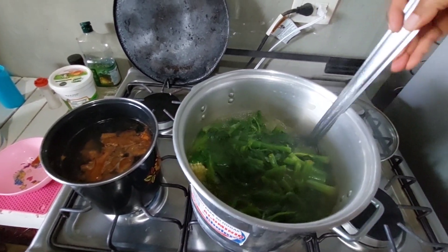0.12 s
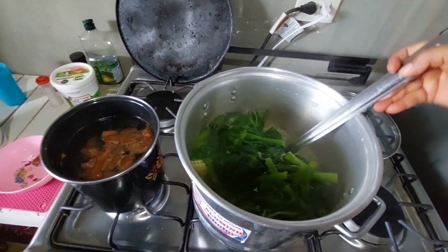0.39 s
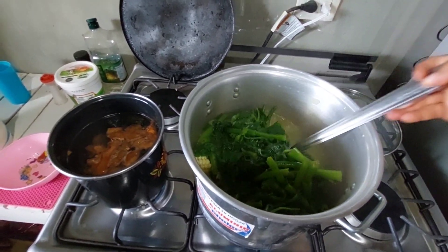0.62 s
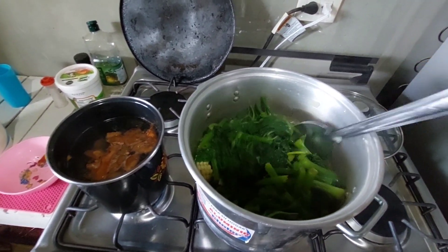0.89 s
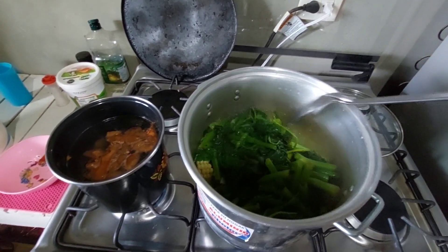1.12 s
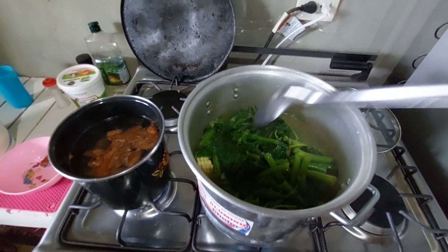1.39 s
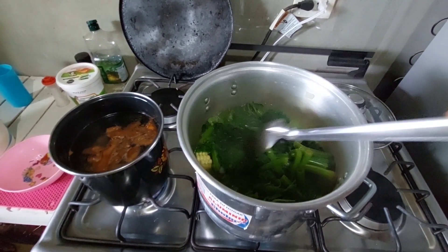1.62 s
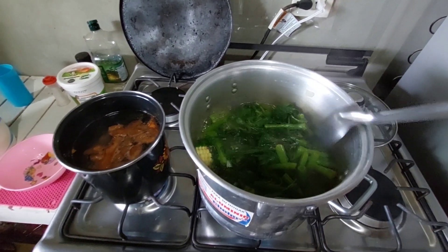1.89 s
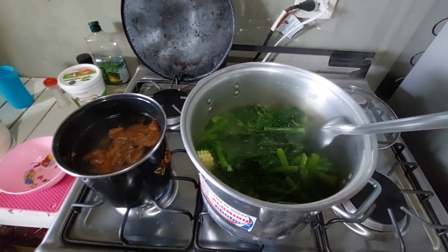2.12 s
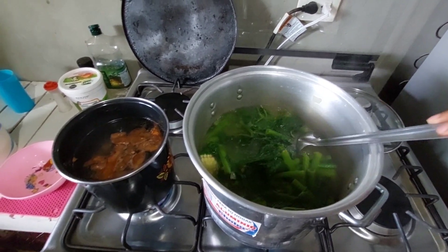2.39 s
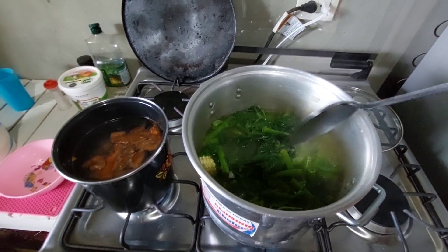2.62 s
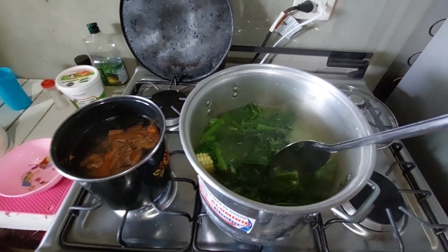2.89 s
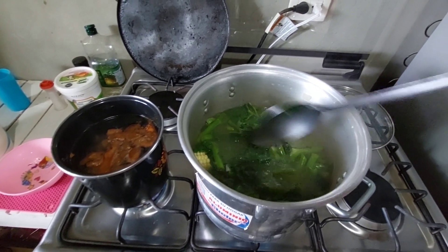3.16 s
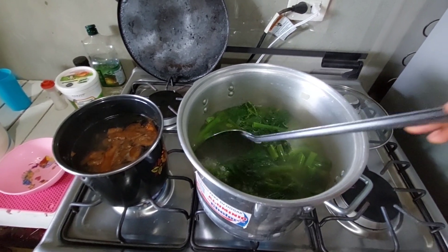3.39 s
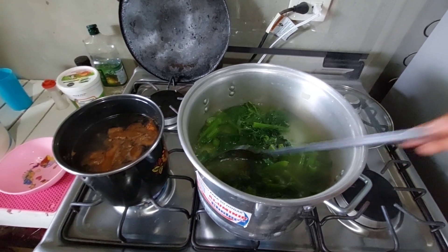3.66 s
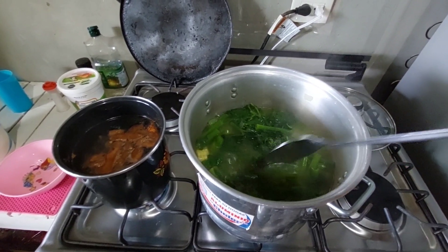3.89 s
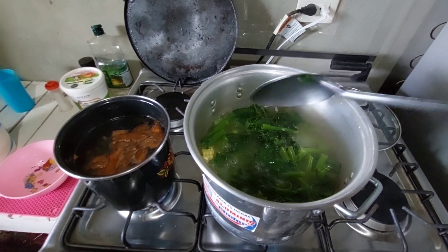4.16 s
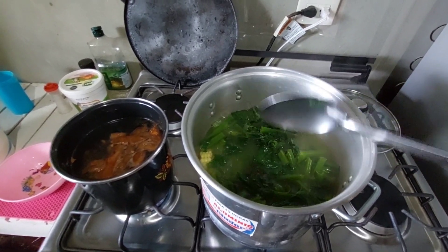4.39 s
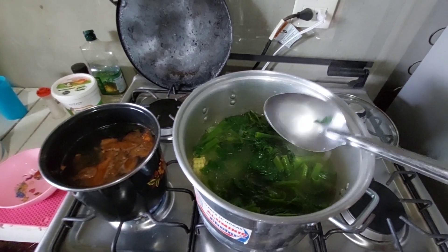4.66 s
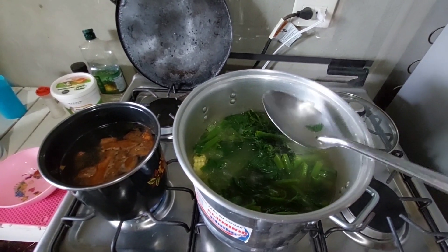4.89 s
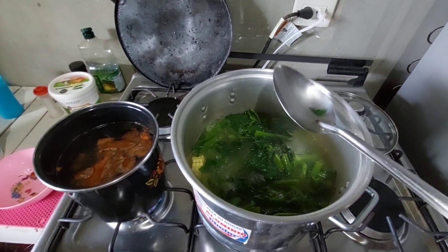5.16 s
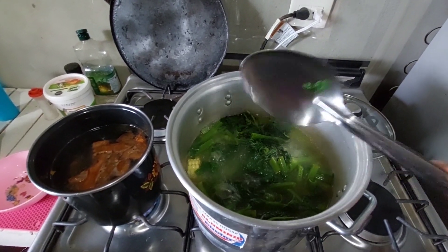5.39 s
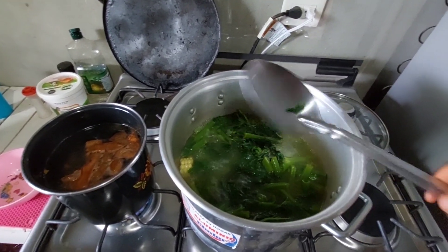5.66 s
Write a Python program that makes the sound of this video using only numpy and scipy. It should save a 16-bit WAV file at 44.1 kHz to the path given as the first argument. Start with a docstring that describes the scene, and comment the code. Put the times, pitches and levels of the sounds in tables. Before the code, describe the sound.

A steel ladle stirs a big pot of soupy greens, with light knocks and scrapes, then sharp bright clanks on the metal rim.

```python
"""First a surge of soup and low pot rumble, then a steel ladle knocks: greens are stirred in a large aluminium
pot on a gas stove, in a small hard-walled kitchen, heard close by at two microphone ports.
Knocks are shaped noise bursts and decaying modes; drags, slosh, burner rumble and air are filtered noise.
Bubbles are short rising sines, squeaks rough tones, and an appliance hums on steady lines.
At the end the ladle is rapped on the rim."""
import sys
import numpy as np
from scipy import signal
from scipy.fft import rfft, irfft, next_fast_len
from scipy.io import wavfile
from scipy.ndimage import map_coordinates

SR = 44100
rng = np.random.default_rng(int(sys.argv[2]) if len(sys.argv) > 2 else 0)


def wrap_up_sound(samples):
    """Save the sound to the file named by the first command line argument, as 16-bit audio."""
    columns = np.atleast_2d(samples).T
    # keep every value between -1 and 1, then stretch to whole-number steps
    tamed = np.clip(columns, -1, 1)
    steps = np.round(tamed * 32767).astype(np.int16)
    wavfile.write(sys.argv[1], SR, steps)


def ratio(d):
    """dB to gain"""
    e = np.asarray(d, float) / 20
    return 10 ** e


N = 254898

# Ladle on pot: start_s, strength_db, wall_db and thud_db (both relative to strength_db),
# then one or more pitch_hz, whose nearest metal modes the place of contact favours
CONTACTS = [(0.1363, -21, -24, -34, 1780, 5222), (0.2731, -44.5, 0.5, -23, 1100),
            (0.3521, -33, -16.5, -12.5, 1100), (0.6988, -46.5, -14, -5, 5222),
            (0.7799, -41, -42, -28, 5222), (0.8204, -41, -22, -9, 3750), (1.0239, -21, -19.5, -10.5, 6401),
            (1.086, -28.5, -26, -9, 4900), (1.9685, -15, -16.5, -21.5, 1780, 1630),
            (2.151, -23.5, -18, -15.5, 1630), (2.2622, -32, -33, -17, 5222), (2.326, -17, -23, -33, 1100),
            (2.528, -28.5, -28.5, -18, 6830), (2.555, -35, -45, -18, 6830), (2.5776, -33.5, -46, -13, 5222),
            (3.4254, -21.5, -23, -12.5, 7504), (3.6494, -45, -21, -11, 2250),
            (3.9941, -39, -13.5, -15, 3160), (4.4975, -6.5, -26.5, -18, 6051, 2713, 7058),
            (4.6514, -4.5, -24, -20.5, 4800, 7058, 5706, 1780), (4.793, -12.5, -38, -21, 6830, 8080),
            (4.8188, -20.5, -37, -24, 6830), (4.9664, -18, -35, -22.5, 4900, 6051),
            (4.9889, -24, -22.5, -17.5, 4900), (5.164, -31, -22, -27, 4900), (5.1843, -33, -22, -36, 4900),
            (5.3389, -21.5, -40, -26, 6051), (5.3469, -24.5, -24, -38, 5502),
            (5.5687, -6, -25, -14.5, 6830, 4900, 3750, 5706)]
# Ring of ladle and wall: pitch_hz, relative level_db, t60_s
METAL_MODES = [(754, -9, .2), (872, -12, .1), (1100, -6, .28), (1630, -10, .08), (1780, -6, .15),
               (2250, -10, .12), (2713, -6, .13), (3160, -12, .12), (2940, -11, .2), (3710, -8, .35),
               (4200, -12, .08), (4800, -8, .1), (4900, -7, .35), (5222, -10, .07), (5502, -9, .06),
               (5706, -11, .14), (6051, -8, .08), (6401, -12, .2), (6830, -6, .13), (7058, -6, .18),
               (7504, -12, .1), (8080, -10, .17)]
# The full pot rocking on its grate: pitch_hz, level_db (relative to the thud), t60_s
POT_MODES = [(69, -34, 0.8), (150.3, -5, 0.5), (221, 1, 0.33), (266.4, -3, 0.094), (301, -9, 0.4),
             (338, -9, 0.35), (413, -10, 0.32), (447, -11, 0.4), (551, -13.5, 0.48), (630, -14, 0.45),
             (694, -16, 0.2)]
# Colour of the first chatter: frequency_hz, relative level_db
CHATTER_COLOUR = [(500, -54), (1000, -32), (1900, -1), (3000, -6.5), (5000, 3.5), (7000, -4.5), (9000, -9),
                  (11000, -6), (13000, -6.5), (15500, -7), (16800, -55)]
# Dense ring of wall and room: frequency_hz, relative level_db
CLANG_COLOUR = [(880, -4.5), (1500, -5), (2210, -4), (2560, -1), (3840, 1.5), (4420, -0.5), (4830, 0.5),
                (5220, -1), (6830, 2), (9100, -8.5), (12000, -9), (15800, -11), (16000, -46)]
# The wall's duller share: frequency_hz, relative level_db
WALL_COLOUR = [(210, -22), (350, -1), (700, -5.5), (771, -3.5), (1060, -5.5), (1270, -8), (1400, -11),
               (1750, -7.5), (2400, -12.5), (3120, -25), (5280, -120)]
# The ladle drags along the wall: start_s, length_s, grit_db, singing_db
DRAG_STROKES = [(0.0, 0.03, -55, -70), (0.266, 0.1, -53.5, -47.5), (0.331, 0.088, -50.5, -52.5),
                (0.506, 0.11, -58.5, -57.5), (0.69, 0.081, -53.5, -60), (1.035, .09, -50, -69),
                (1.885, 0.06, -64.5, -62), (2.174, 0.14, -47.5, -74), (2.342, 0.056, -60, -48.5),
                (2.542, 0.017, -50, -70), (3.45, 0.21, -58.5, -63), (3.882, 0.1, -65.5, -60),
                (4.637, 0.023, -45, -58), (4.74, 0.4, -57, -69), (5.137, 0.15, -59.5, -61),
                (5.652, .12, -47, -65)]
# Colour of the grit: frequency_hz, relative level_db
GRIT_COLOUR = [(880, -34), (1500, 0), (1790, -4), (3220, -1), (4160, 0.5), (4370, 1), (5220, -2),
               (7170, -1), (8920, -14.5), (12000, -8), (16000, -12)]
# The ladle's edge catches and one mode squeaks: start_s, length_s, level_db, pitch_hz
EDGE_SQUEAKS = [(.285, .02, -60, 2650), (.34, .02, -52, 1150), (.693, .035, -62, 3750),
                (.703, .042, -60, 6200), (.762, .02, -60, 4700), (.765, .025, -61, 7000),
                (.774, .012, -55, 5200), (.776, .03, -61, 2720), (.822, .02, -59, 5200),
                (.822, .045, -63, 2720), (2.152, .045, -55, 2150), (2.195, .035, -56, 2600),
                (2.258, .045, -54, 5200), (2.258, .035, -55, 7200), (2.35, .1, -60, 5700),
                (2.54, .04, -57, 4900), (2.548, .035, -55, 6830), (2.553, .035, -56, 3750),
                (5.07, .07, -59, 4900)]
# Soup and pot over time: time_s, slosh_db, pot_rumble_db
SOUP_LEVELS = [(0.0, -40.5, -37), (0.08, -50, -41), (0.24, -53, -43.5), (0.53, -52, -44),
               (0.79, -55.5, -47.5), (1.09, -57.5, -47.5), (1.54, -62.5, -51.5), (1.98, -58.5, -43),
               (2.14, -60, -44), (2.95, -61.5, -48.5), (3.32, -64, -50), (3.56, -59.5, -45),
               (4.22, -57, -46.5), (4.54, -59.5, -53), (4.67, -42.5, -34), (5.01, -50, -43),
               (5.47, -56.5, -42), (5.6, -57, -46), (5.78, -40.5, -37.5)]
# Colour of the slosh: frequency_hz, relative level_db
SLOSH_COLOUR = [(260, -12), (450, -1), (549, -3.5), (1190, -15.5), (1340, -14.5), (3000, -20.5),
                (3900, -43), (6600, -120)]
# Bubbles and drips that stand out: start_s, strength_db, starting pitch_hz, life_cycles
STANDOUT_PLOPS = [(.257, -31, 880, 1.3), (.409, -27, 1250, 1.2), (.421, -22.5, 880, 1.75),
                  (.4225, -25.5, 1700, 0.9), (.9467, -38, 1070, 2.1), (.997, -44, 12500, 4),
                  (1.71, -40.5, 640, 1.8), (1.925, -35.5, 800, 2), (2.755, -47, 905, 1.5),
                  (2.7696, -40.5, 1240, 2), (2.7744, -45, 2010, 1.8), (3.3633, -48, 1910, 2.7),
                  (3.595, -33, 990, 1.5), (3.669, -45, 1180, 3), (3.7599, -43, 7900, 3.5),
                  (3.77, -47, 11500, 3), (3.864, -43, 740, 2.1), (3.891, -30, 580, 1.4),
                  (3.897, -40, 1060, 2.4), (3.956, -42, 870, 2.6), (3.9935, -30, 1410, 2.5),
                  (4.155, -45, 13500, 3), (4.1845, -44, 11000, 3), (4.2163, -42, 5680, 2.6),
                  (4.283, -41, 1200, 2), (4.2904, -46, 4960, 3.2), (4.4174, -41.5, 5130, 2.9),
                  (5.069, -31.5, 822, 3.4), (5.442, -31.5, 1310, 3.9), (5.4445, -35, 1900, 5.1),
                  (5.448, -33, 800, 1.6), (5.4544, -33, 1490, 1.9), (5.456, -37, 2450, 3),
                  (5.5009, -40, 5400, 2.6), (5.532, -42, 5300, 2.6)]
# The burner heard through the pot: pitch_hz, width_hz, relative level_db
POT_RESONANCES = [(116.4, 8.8, 7), (159, 35, -12), (258, 55.4, -0.5), (363, 42, -17.5), (413, 40, -15.5)]
# The stove's deepest rumble: time_s, level_db
STOVE_LEVELS = [(0.0, -54), (0.35, -55), (1.72, -68), (2.4, -58), (2.72, -79), (4.41, -63), (4.77, -44),
                (5.02, -48), (5.3, -57), (5.78, -53)]
# Lines of the appliance: pitch_hz, level_db
HUM_LINES = [(59.2, -61.5), (118.4, -58.5), (263.8, -57), (414.5, -66), (489.9, -64), (532.9, -72)]
# Colour of the air: frequency_hz, relative level_db
AIR_COLOUR = [(15, -37), (25, -10), (111, -3), (197, -10), (266, 19), (349, 0), (496, -0.5), (766, -37.5),
              (1220, -21.5), (1430, -49), (3410, -41), (7710, -35), (9330, -51), (12500, -41.5),
              (16000, -40)]
# Likeness of the two ports in diffuse sound: frequency_hz, likeness (1 = same, 0 = unrelated)
PORT_LIKENESS = [(60, 1), (290, 0.86), (640, 0.37), (1400, -0.13), (15000, 0.075)]
# Colour difference of the microphones: frequency_hz, left_over_right_db
PORT_BALANCE = [(60, -2), (300, -1.5), (1000, -0.5), (4000, 1.1), (12000, 2)]
# Decay of wall and room: frequency_hz, t60_s
KITCHEN_DECAY = [(200, 0.8), (600, 0.64), (1500, 0.52), (4000, 0.48), (10000, 0.31)]


def knocks():
    """Each contact: a few ms of chatter, a dense clang, a duller wall knock and the pot's thud."""
    out, t = np.zeros((2, N)), np.arange(SR // 2) / SR
    for start_s, db, wall_db, thud_db, pitch_hz, *_ in CONTACTS:
        favoured = np.transpose(METAL_MODES)[0] == nearest_mode(pitch_hz)[0]
        lift_db = 4 + 3 * rng.standard_normal(len(METAL_MODES)) + 2 * favoured
        click = ratio(db + 1.5) * chatter(t, lift_db + 7 * favoured)
        clang = wash(t, lambda hz: ratio(along(CLANG_COLOUR, hz)) * modal(hz, lift_db, width_hz=20))
        wall = wash(t, lambda hz: ratio(along(WALL_COLOUR, hz)) * modal(hz, lift_db, width_hz=12))
        pot = pot_thud(t, db + thud_db)
        near = ports(click, lag_s=0.00012)
        add(out, start_s, near + ratio(db - 20.5) * clang + ratio(db + wall_db) * wall + pot)
        add(out, start_s, ratio(-7) * kitchen(pot))
    return out


def chatter(t, lift_db):
    """The first touch: a few ms of noise gathered around the metal's modes, scaled to peak 1."""
    noise = rng.standard_normal(len(t))
    burst = filtered(noise, lambda hz: ratio(along(CHATTER_COLOUR, hz)) * modal(hz, lift_db, width_hz=170))
    burst *= (1 - np.exp(-t / 0.0004)) * np.exp(-(t / 0.0032) ** 2)
    return burst / np.abs(burst).max()


def wash(t, colour):
    """Countless close modes of wall and room blur into dying noise, louder in its first instants."""
    tail = diffuse(dying(len(t)), colour) * rough(len(t), depth=0.2, top_hz=153)
    onset = (1 - np.exp(-t / 0.00091)) * (1 + 2.14 * ratio(-60 * t / 0.024))
    return onset * tail / np.std(tail[:, t < 0.03])


def pot_thud(t, db):
    """The pot rocks on its grate: decaying low modes, roughened as the grate rattles."""
    thud = ring(POT_MODES, t, spread_db=1)
    # a low room mode near 114 Hz swells in after the pot's modes
    swell = 1 - np.exp(-(t / 0.035) ** 2)
    thud += swell * ring([(114, -2, 0.55)], t, spread_db=1)  # pitch_hz, level_db, t60_s
    rattle = rough(len(t), depth=0.7, top_hz=70) - 1
    rattle_rise = 1 - np.exp(-t / 0.03)
    thud *= ratio(db) * (1 - np.exp(-t / 0.004)) * (1 + rattle_rise * rattle)
    return filtered(thud, lambda hz: 1 / (1 + (55 / (hz + 1)) ** 6))


def pings():
    """The metal's modes ring out of the clang, favoured ones most: a strong instant, then a rough fading tone."""
    out, t = np.zeros((2, N)), np.arange(SR // 2) / SR
    for start_s, db, wall_db, _, first_hz, *also_hz in CONTACTS:
        favoured = []
        for k, pitch_hz in enumerate([first_hz, *also_hz]):
            hz, _, t60 = nearest_mode(pitch_hz)
            # each further mode is 1 dB weaker; long ringers start lower
            favoured.append((hz, -k - 6 * np.log10(max(1, t60 / 0.13)), t60))
        others = [(hz, level_db - 13.5, t60) for hz, level_db, t60 in METAL_MODES]
        tone = ring(favoured, t, spread_db=1) + ring(others, t, spread_db=4)
        ring_db = -18 - 2 * np.log2(first_hz / 2000)
        if first_hz < 2500:  # modes this low belong to the pot wall
            ring_db = max(ring_db, wall_db + 4)
        tone *= ratio(db + ring_db)
        tone *= rough(len(t), depth=0.6, top_hz=45) * (0.6 + 0.5 * ratio(-60 * t / 0.04))
        add(out, start_s, ports(tone, lag_s=0.00004))
        add(out, start_s, ratio(-12) * kitchen(tone))
    return out


def strokes():
    """Grit and singing levels in dB: each drag rises fast, holds and fades."""
    start, length, grit_db, sing_db = np.transpose(DRAG_STROKES)[..., None]
    t = np.arange(N) / SR
    rise_db, fall_db = 402 * (t - start), 135 * (start + length - t)  # slopes in dB per second
    shape_db = np.minimum(0, np.minimum(rise_db, fall_db))
    # between strokes the ladle only brushes the greens
    grit = np.maximum(-72, (grit_db + shape_db).max(axis=0))
    singing = np.maximum(-78, (sing_db + shape_db).max(axis=0))
    return grit, singing


def dragging():
    """The ladle drags on the wall: gritty noise around the metal's modes, and a singing band near 1150 Hz."""
    grit_db, sing_db = strokes()
    lift_db = np.full(len(METAL_MODES), 4.5)
    grit = rush(lambda hz: ratio(along(GRIT_COLOUR, hz)) * modal(hz, lift_db, width_hz=21), flutter_db=0.5)
    singing = rush(lambda hz: 1 / (1 + ((hz - 1150) / 95) ** 2), flutter_db=1.5)
    return ratio(grit_db + 2.2 * wobble(45)) * grit + ratio(sing_db + 1.5 * wobble(60)) * singing


def squeaks():
    """Short rough tones on single modes: the listed ones, and chance ones as loud as the drag allows."""
    out, grit_db, count = np.zeros(N), strokes()[0], 160
    luck, size = rng.random((count, 3)), rng.standard_normal(count)
    chance = []
    for (place, stretch, pick), spread in zip(luck, size):
        grit = grit_db[int(place * N)]
        allowed_db = min(grit, 3 * grit + 2 * 62)  # a drag lighter than -62 dB hardly catches
        pitch_hz = METAL_MODES[int(pick * len(METAL_MODES))][0]
        chance.append((place * N / SR, 0.025 * (0.4 + stretch), allowed_db - 14 + 2 * spread, pitch_hz))
    for start_s, length_s, db, hz in EDGE_SQUEAKS + chance:
        t = np.arange(round(length_s * SR)) / SR
        tone = np.sqrt(np.sin(np.pi * t / length_s)) * np.sin(2 * np.pi * hz * t)
        add(out, start_s, ratio(db) * tone * rough(len(t), depth=1.2, top_hz=170))
    return ports(out, lag_s=0.00004) + ratio(-6) * kitchen(out)[:, :N]


def sloshing():
    """Stirred soup washes about: broad noise, strongest in the low mids, with an uneven level."""
    slosh_db, _ = curves(SOUP_LEVELS)
    slosh = rush(lambda hz: ratio(along(SLOSH_COLOUR, hz)), flutter_db=1)
    return ratio(slosh_db + 2.4 * wobble(25)) * slosh


def bubbles(events, rise, room_db):
    """Short sines of a few cycles whose pitch climbs as the bubble nears the surface."""
    out = np.zeros(N)
    for start_s, db, hz, cycles in events:
        cycles = max(cycles, 0.5)
        turns = np.arange(round(4 * cycles * SR / hz)) * hz / SR
        shape = (1 - np.exp(-turns / 0.5)) * np.exp(-turns / cycles)
        add(out, start_s, ratio(db) * shape * np.sin(2 * np.pi * turns * (1 + rise * turns / cycles)))
    return ports(out, lag_s=0.00003) + ratio(room_db) * kitchen(out)[:, :N]


def fizz():
    """Rows for tiny bubbles that burst at chance moments, sizes and pitches."""
    count, life_cycles = 60, 3
    when = rng.random(count) * N / SR
    size, pitch = rng.standard_normal((2, count))
    pitch_hz = np.minimum(9500 * 2 ** (0.5 * pitch), SR / 3)  # spread of half an octave
    return [(s, -52 + 3 * a, hz, life_cycles) for s, a, hz in zip(when, size, pitch_hz)]


def pot_rumble():
    """The burner rumbles through the pot: noise gathered in the pot's broad low resonances."""
    _, pot_db = curves(SOUP_LEVELS)

    def hollow(f):
        """Sum of the resonance peaks at each frequency."""
        return sum(ratio(db) / (1 + (2 * (f - hz) / width) ** 2) for hz, width, db in POT_RESONANCES)

    return ratio(pot_db + 1.6 * wobble(8.7)) * rush(hollow, flutter_db=2)


def stove_rumble():
    """The stove's deepest rumble: a narrow band of noise around 63 Hz."""
    (stove_db,) = curves(STOVE_LEVELS)
    return ratio(stove_db) * rush(lambda hz: 1 / (1 + ((hz - 63) / 9) ** 4), flutter_db=0.1)


def appliance():
    """Mains-driven hum, each line wavering a little in level and phase."""
    t, hum = np.arange(N) / SR, np.zeros(N)
    for hz, db in HUM_LINES:
        level = ratio(db + 1.1 * wobble(4.92))
        hum += level * np.sin(2 * np.pi * hz * t + 0.3 * wobble(3.77))
    return hum


def room_air():
    """Steady diffuse noise above 600 Hz, and a more fluttering share below."""
    high = rush(lambda hz: ratio(along(AIR_COLOUR, hz)) * (hz > 600), flutter_db=1.6)
    low = rush(lambda hz: ratio(along(AIR_COLOUR, hz)) * (hz <= 600), flutter_db=6.5)
    return ratio(-64.5) * high + ratio(-60) * low


def nearest_mode(pitch_hz):
    """The metal mode closest to a pitch."""
    return min(METAL_MODES, key=lambda mode: abs(mode[0] - pitch_hz))


def modal(hz, lift_db, width_hz):
    """Noise in the metal gathers around its modes, each at its own strength."""
    peaks = 0
    for (mode_hz, db, _), lift in zip(METAL_MODES, lift_db):
        peaks = peaks + ratio(db + lift) / (1 + ((hz - mode_hz) / width_hz) ** 2)
    return 1 + peaks


def ring(modes, t, spread_db):
    """Decaying modes, each struck at a new strength and phase."""
    hz, db, t60 = np.transpose(modes)[..., None]
    strength, phase = rng.standard_normal((2, len(modes), 1))
    level = ratio(db + spread_db * strength - 60 * t / t60)
    return np.sum(level * np.sin(2 * np.pi * hz * t + phase), axis=0)


def rough(n, depth, top_hz):
    """A gain that flutters around 1, as when a ringing part rattles."""
    return 1 + depth * unit(filtered(rng.standard_normal(n), lambda hz: hz < top_hz))


def dying(n):
    """Two unrelated noises in which each frequency dies at its own speed."""
    hz, t, z = signal.stft(rng.standard_normal((2, n)), SR, nperseg=256)
    decay = ratio(-60 * t / along(KITCHEN_DECAY, hz)[:, None])
    return signal.istft(z * decay, SR, nperseg=256)[1][:, :n]


def kitchen(x):
    """A fresh room tail for one sound, arriving 130 samples (3 ms) late."""
    tail = diffuse(dying(SR // 2), lambda hz: 1 + 0 * hz)
    return signal.fftconvolve(np.pad(x, (130, 0))[None], tail / np.linalg.norm(tail[0]), axes=1)


def ports(x, lag_s):
    """A near sound reaches the right port a little later than the left."""
    return filtered(x, lambda hz: np.exp(2j * np.pi * hz * lag_s * np.array([[0.5], [-0.5]])))


def diffuse(pair, gain):
    """Two unrelated signals become a port pair: alike in the bass, nearly unrelated in the treble."""
    def share(hz):
        """Gains of the common and the opposed part."""
        turn = np.arccos(np.clip(along(PORT_LIKENESS, hz), -1, 1)) / 2
        return gain(hz) * [np.cos(turn), np.sin(turn)]

    mid, side = filtered(pair, share)
    return np.array([mid + side, mid - side])


def rush(gain, flutter_db):
    """Diffuse noise of rms 1 whose level flutters every few milliseconds."""
    noise = rng.standard_normal((2, N)) * ratio(flutter_db * wobble(300))
    return unit(diffuse(noise, lambda hz: gain(hz) * (hz < 15950)))


def wobble(rate):
    """A smooth random curve, rate knots a second."""
    knots = rng.standard_normal(int(N * rate / SR) + 4)
    return map_coordinates(knots, [np.arange(N) * rate / SR])


def curves(rows):
    """One value per sample for each column after the time."""
    time_s, *columns = np.transpose(rows)
    return [np.interp(np.arange(N) / SR, time_s, column) for column in columns]


def along(points, hz):
    """(frequency_hz, value) points read on a log axis."""
    f, v = np.transpose(points)
    return np.interp(np.log(hz + 1), np.log(f + 1), v)


def filtered(x, response):
    """x times a response of frequency."""
    n = x.shape[-1]
    m = next_fast_len(n + 8192)
    return irfft(rfft(x, m) * response(np.fft.rfftfreq(m, 1 / SR)), m)[..., :n]


def unit(x):
    """Scaled to rms 1."""
    return x / np.sqrt(np.mean(x ** 2) + 1e-20)


def add(track, start_s, sound):
    """Mix a sound into the track from start_s."""
    part = track[..., round(start_s * SR):][..., :sound.shape[-1]]
    part += sound[..., :part.shape[-1]]


def scene():
    """Everything at the two ports, from the ladle to the room's air."""
    ladle = knocks() + pings() + dragging() + squeaks()
    soup = sloshing() + bubbles(STANDOUT_PLOPS + fizz(), rise=0.017, room_db=-8)
    background = pot_rumble() + stove_rumble() + appliance() + room_air()
    return ladle + soup + background


def top_cut(x):
    """Nothing passes above the cut-off."""
    return signal.sosfilt(signal.butter(12, 16830, fs=SR, output="sos"), x)


def record(dry):
    """The two microphones lose the deepest bass and differ a little in colour."""
    def colour(hz):
        """Response of the left and right microphone."""
        balance = ratio(along(PORT_BALANCE, hz) * np.array([[0.5], [-0.5]]))
        return balance / np.sqrt(1 + (48 / (hz + 1)) ** 5)

    mix = filtered(dry, colour)
    return top_cut(mix)


dry = scene()
out = record(dry)
wrap_up_sound(out)
```